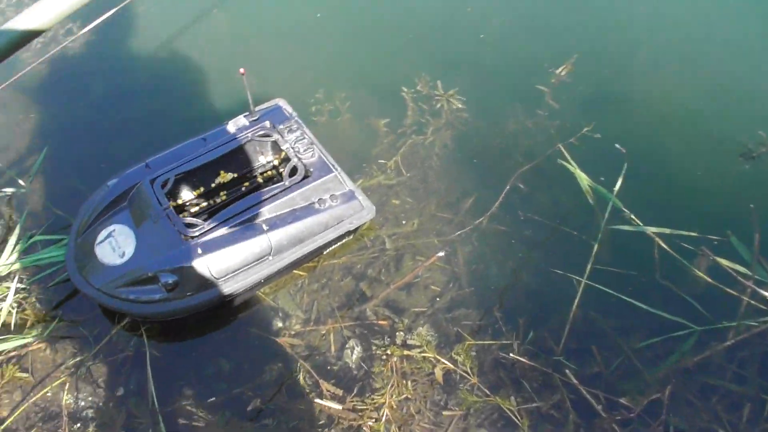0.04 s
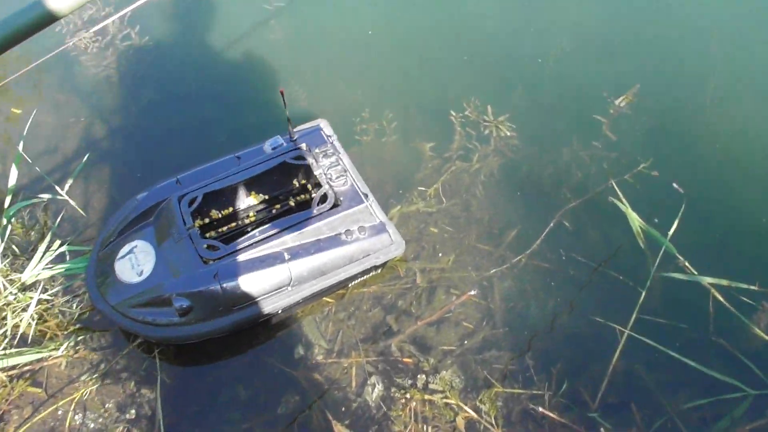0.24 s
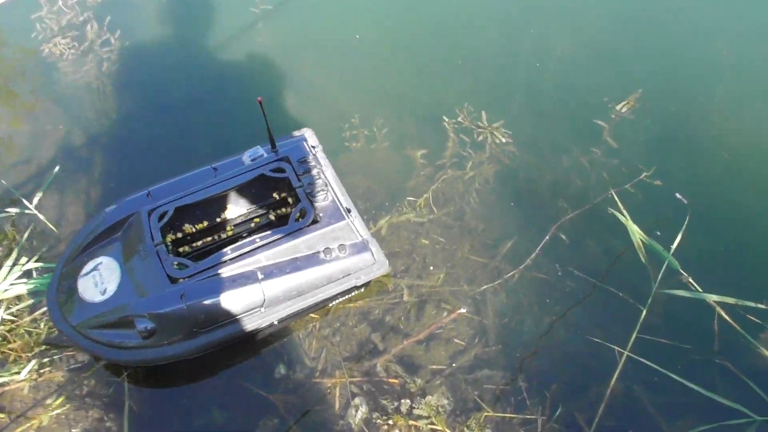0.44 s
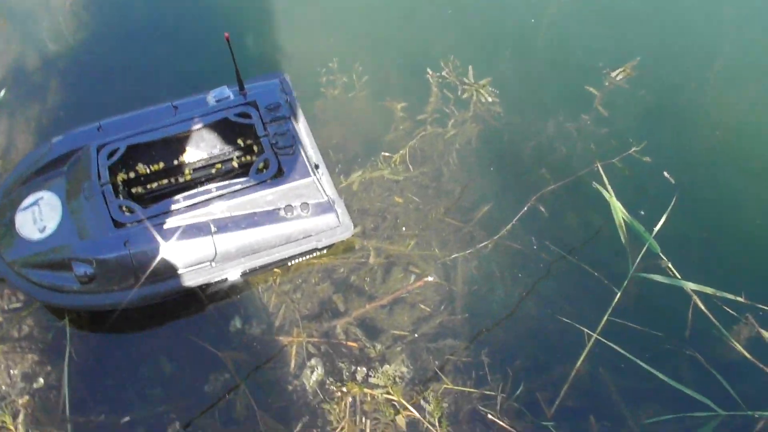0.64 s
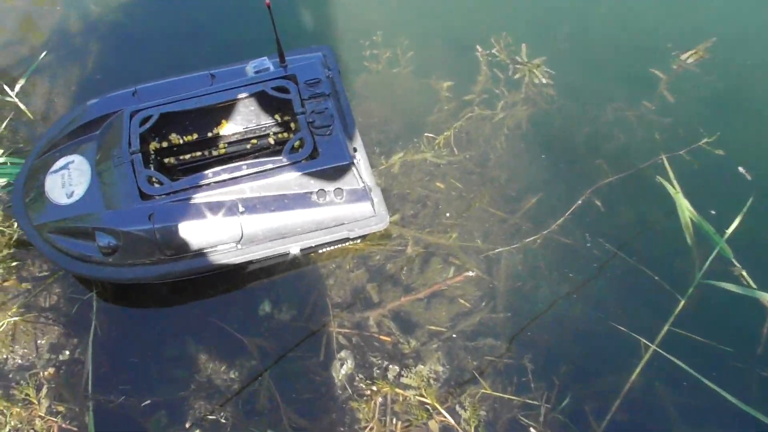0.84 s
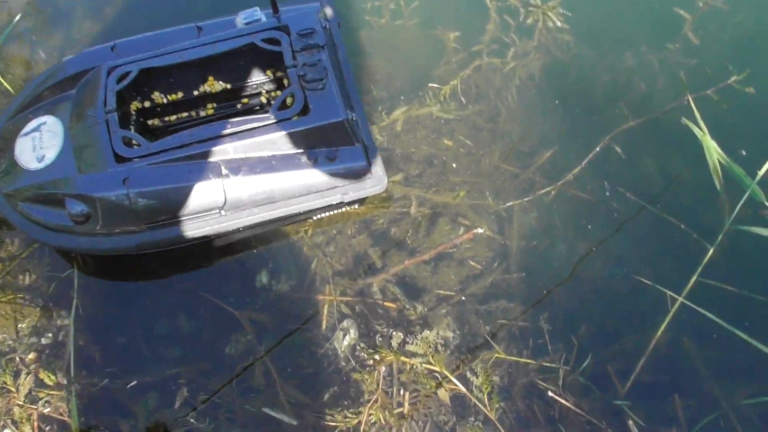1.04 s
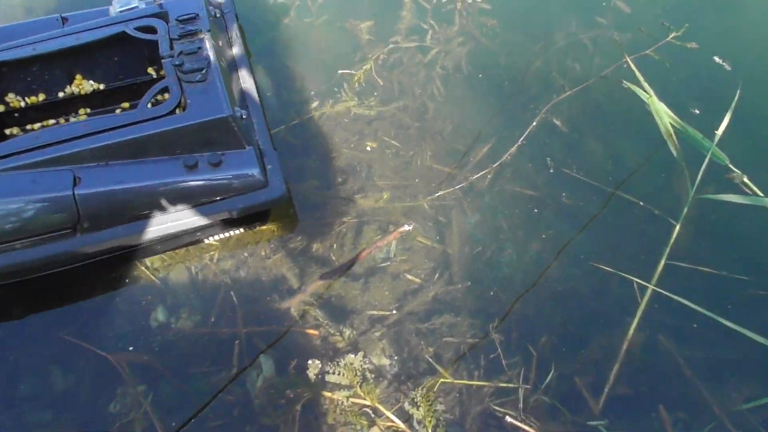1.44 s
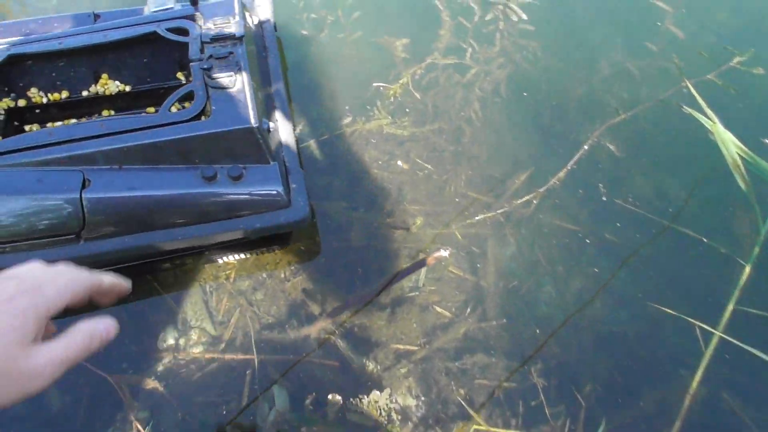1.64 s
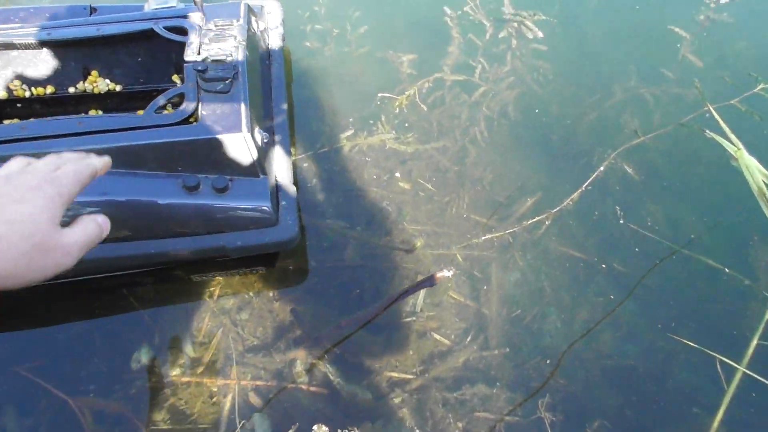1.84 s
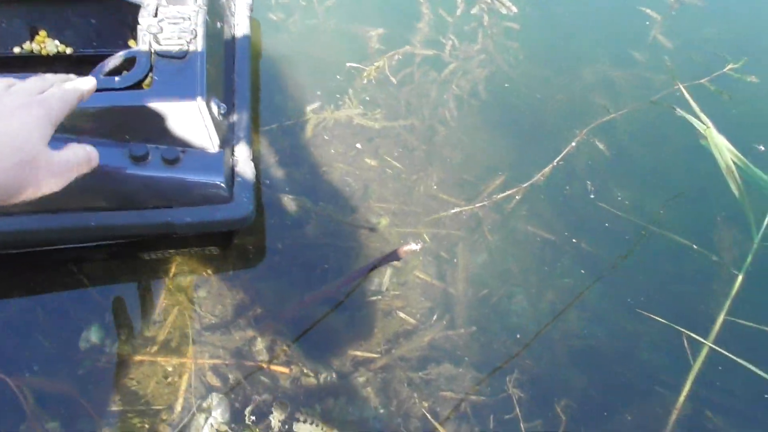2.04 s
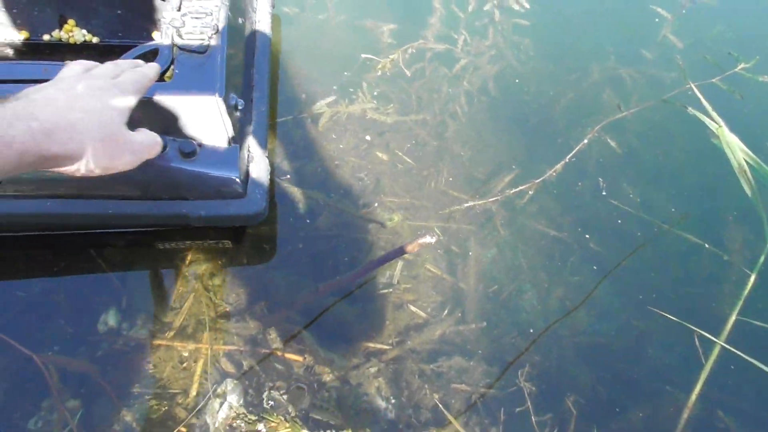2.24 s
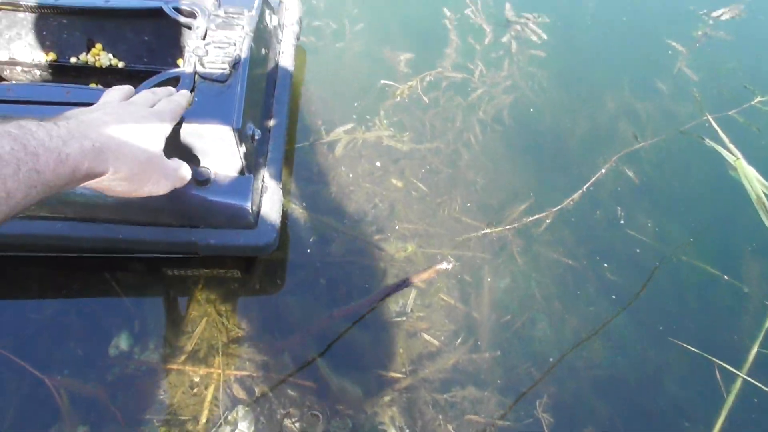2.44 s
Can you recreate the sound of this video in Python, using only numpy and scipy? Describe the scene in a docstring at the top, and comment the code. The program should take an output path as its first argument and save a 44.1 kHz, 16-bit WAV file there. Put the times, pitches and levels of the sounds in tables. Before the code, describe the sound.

Close handling of a plastic toy boat: rubbing, ticks and dull knocks outdoors.

```python
"""At a pond's edge, someone leans over a small model boat with a camera in hand.
Close by, fingers rub the plastic casing (stick-slip friction), the casing ticks (impact excitation),
a button snaps down and up (pressure pulses), and fingers and hull knock dully (damped vibration).
Behind lie a low outdoor rumble, a faint hum and one distant songbird, its whistles
reflected from the banks."""
import sys
import numpy as np
from scipy import signal
from scipy.fft import rfft, irfft
from scipy.io import wavfile
from scipy.ndimage import uniform_filter1d

SR = 44100
rng = np.random.default_rng(int(sys.argv[2]) if len(sys.argv) > 2 else 0)


def to_wav(s):
    """Save 16-bit WAV."""
    ch = np.atleast_2d(s).T  # columns
    pcm = np.round(np.clip(ch, -1, 1) * 32767)  # PCM
    wavfile.write(sys.argv[1], SR, pcm.astype(np.int16))


N = 114660
TOP_HZ = 16200


def undb(db):
    """Amplitude ratio for a level in decibels."""
    return 10 ** (np.asarray(db) / 20)


def unit(x):
    """Normalisation to rms 1."""
    return x / np.sqrt(np.mean(x ** 2))


def unit_energy(x):
    """Normalisation of each channel to energy 1."""
    return x / np.sqrt(np.sum(x ** 2, axis=-1, keepdims=True))


def colour(x, response):
    """Minimum-phase filtering by a response (f/Hz, gain/dB), built by folding the cepstrum."""
    size = 2 * N
    hz, db = np.array(response, float).T
    gain = undb(np.interp(np.log(np.fft.rfftfreq(size, 1 / SR) + 1), np.log(hz), db))
    cepstrum = irfft(np.log(gain))
    cepstrum[1:N] *= 2
    cepstrum[N + 1:] = 0
    return irfft(rfft(x, size) * np.exp(rfft(cepstrum)))[..., :N]


def wander(rate):
    """Random modulation of rms 1, gliding to a new value `rate` times a second."""
    hold = max(int(SR / rate), 2)
    steps = np.repeat(rng.standard_normal(N // hold + 1), hold)
    return unit(uniform_filter1d(steps, hold)[:N])


def envelope(table, column=1):
    """Amplitude envelope, interpolated in decibels between the rows of a table."""
    rows = np.array(table, float)
    return undb(np.interp(np.arange(N) / SR, rows[:, 0], rows[:, column]))


def stereo(mid, side, width):
    """Mid-side stereo: the mid is in phase in both channels, the filtered side in antiphase."""
    return mid + colour(side, width) * np.array([[1], [-1]])


def add(out, start, sound):
    """Superposition of a sound from a start time in seconds."""
    i = max(int(start * SR), 0)
    out[..., i:i + sound.shape[-1]] += sound[..., :N - i]


# Spectrum of the outdoor background: f/Hz, relative level/dB
AMBIENT_SPECTRUM = [(15, -66), (25, 2.5), (87, 4.5), (223, -8), (384, -0.5), (887, -12.5), (1400, -28.5),
                    (5280, -29.5), (6920, -19.5), (16000, -32)]
# Its stereo width: f/Hz, side-to-mid ratio/dB
AMBIENT_WIDTH = [(30, -30), (120, -2.5), (4400, -39), (14000, 1)]
def outdoor_rumble(level_db=-49, swell_db=1.5):
    """Filtered noise: a low rumble and thin hiss swell gently by amplitude modulation."""
    mid, side = unit(colour(rng.standard_normal((2, N)), AMBIENT_SPECTRUM))
    return stereo(mid, side, AMBIENT_WIDTH) * undb(level_db + swell_db * wander(9.65))


def slip_noise(bands=10, slips_per_band_s=900, spread_db=3.2):
    """Shot noise: two independent streams of slips, mostly small, each slip sounding in one band."""
    shape = (bands, 2, N)
    occurs = rng.random(shape) < slips_per_band_s / SR
    strength = undb(spread_db * np.minimum(rng.exponential(size=shape), 5))
    slips = occurs * strength * rng.choice([-1, 1], shape)
    band_position = np.fft.rfftfreq(N, 1 / SR) / TOP_HZ * (bands - 1)
    windows = (np.cos(np.pi / 2 * np.clip(band_position - k, -1, 1)) for k in range(bands))
    return irfft(sum(spectrum * window for spectrum, window in zip(rfft(slips), windows)), N)


# Course of the rubbing: t/s, hiss level/dB, rumble level/dB
RUB_LEVELS = [(0, -44, -43.5), (.06, -50, -47.5), (.30, -55, -84), (.375, -42.5, -54), (.42, -55, -50.5),
              (.485, -51, -47), (.497, -36.5, -35.5), (.53, -38.5, -34.5), (.60, -46.5, -48),
              (.645, -43, -43), (.72, -47, -48), (.82, -48, -47), (.865, -43.5, -47.5),
              (.995, -50.5, -44.5), (1.015, -36, -38.5), (1.07, -44, -39.5), (1.13, -51, -47),
              (1.29, -49, -43), (1.42, -54.5, -54), (1.72, -53.5, -52), (1.80, -46.5, -47),
              (1.91, -56.5, -54.5), (1.95, -41.5, -40), (2.02, -62.5, -63), (2.18, -56.5, -50),
              (2.428, -64.5, -63), (2.44, -53, -56), (2.6, -58, -54.5)]
# Spectra of the friction hiss and rumble: f/Hz, relative level/dB
RUB_HISS_SPECTRUM = [(700, -40), (1400, -12), (2800, -8), (4400, 0.5), (5200, -7), (6000, 2.5), (7200, 6.5),
                     (9000, 1.5), (11000, -5.5), (16000, -15.5)]
RUB_RUMBLE_SPECTRUM = [(30, -7.5), (180, -1.5), (600, -2.5), (1100, -5), (1400, -17.5), (5000, -42.5)]
# Stereo widths of the casing's hiss, ticks and scrapes, and of its rumble: f/Hz, side-to-mid ratio/dB
CASING_WIDTH = [(2400, -14), (5400, -27), (6800, -14), (8500, -2), (13000, -1)]
RUB_RUMBLE_WIDTH = [(200, -2), (900, -9)]
def finger_rubbing(flutter_db=1.2):
    """Stick-slip friction: skin catches and slides on plastic, giving a crackly hiss and a rumble."""
    def layer(spectrum, width):
        mid, side = unit(colour(slip_noise(), spectrum))
        return stereo(mid, side, width) * undb(flutter_db * wander(70))
    hiss = layer(RUB_HISS_SPECTRUM, CASING_WIDTH) * envelope(RUB_LEVELS)
    rumble = layer(RUB_RUMBLE_SPECTRUM, RUB_RUMBLE_WIDTH) * envelope(RUB_LEVELS, column=2)
    return hiss + rumble


# Response of the small casing: f/Hz, gain/dB
CASING_RESPONSE = [(300, -10.5), (1000, -19), (1400, -51.5), (2500, -18), (3400, -7), (5200, -1.5),
                   (6000, 5), (8200, 6), (11500, -11), (16000, -14)]
# Impacts on the plastic: t/s, relative level/dB, mode f/Hz, scrape time constant/ms
TICK_IMPACTS = [(0.0874, -9.5, 8000, 0.67), (0.089, -6.5, 6140, 0.37), (0.186, -13, 7640, 0.23),
                (0.1915, -17.5, 6800, 0.42), (0.2106, -22, 5600, 0.2), (.2840, -5.5, 6760, 0.14),
                (0.291, -19.5, 5960, 1.2), (0.388, -18, 6200, 0.24), (0.3944, -23.5, 6000, 0.1),
                (0.4197, -31, 5100, 0.1), (0.5211, -11.5, 6600, 5.7), (0.575, -10.5, 7960, 0.5),
                (0.852, -25.5, 8900, 0.66), (1.0322, -16.5, 7350, 1.1), (1.0897, -26.5, 10300, 0.4),
                (1.1758, -16.5, 7650, 0.21), (1.198, -21.5, 7440, 0.3), (1.6465, -18, 8500, 2.5),
                (1.9333, -22.5, 7740, 0.82), (1.9597, -24, 7750, 1.8), (1.9870, -20.5, 12500, 0.21),
                (2.1366, -22, 6400, 0.31), (2.1818, -13, 7800, 0.55), (2.1834, -17, 3800, 1.5),
                (2.195, -25, 7700, 0.52), (2.2804, -17, 6930, 2.7)]
def casing_ticks(ring_decay_s=.0003, rattle_decay_s=.004, rattle_db=-4, crack_db=-1, side_db=-3):
    """Impact excitation: a snap with a brief scrape and rattle drives the casing and one damped mode."""
    t = np.arange(2048) / SR
    cracks, rings = np.zeros((2, N)), np.zeros((2, N))
    for start, db, hz, scrape_ms in TICK_IMPACTS:
        scrape_noise, rattle_noise = rng.standard_normal((2, 2, len(t)))
        contact = 2 * scrape_ms * unit_energy(scrape_noise * np.exp(-(1000 * t / scrape_ms) ** 2))
        contact[0, 0] += np.exp(-scrape_ms)  # the snap: strongest when the scrape is short
        rattle = unit_energy(rattle_noise * np.exp(-t / rattle_decay_s))
        force = unit_energy(contact) + undb(rattle_db) * rattle
        mode = np.sin(2 * np.pi * hz * t) * np.exp(-t / ring_decay_s)
        add(cracks, start, 2 * undb(db + crack_db) * force)
        add(rings, start, 2 * undb(db) * unit_energy(signal.fftconvolve(force, mode[None])))
    mid, side = colour(cracks, CASING_RESPONSE) + rings
    return stereo(mid, undb(side_db) * side, CASING_WIDTH)


# Press and release of the button: t/s, peak level/dB, polarity, Gaussian half-width/ms
BUTTON_PULSES = [(0.0887, -7, -1, 0.36), (0.2851, -2, 1, 0.3)]
def button_snap():
    """Pressure pulses of opposite sign: the button pushes the casing in, then lets it go."""
    t, out = np.arange(N) / SR, np.zeros(N)
    for peak_s, db, polarity, width_ms in BUTTON_PULSES:
        out += polarity * undb(db) * np.exp(-.5 * (1000 * (t - peak_s) / width_ms) ** 2)
    return out


# Short slides: centre t/s, duration/s, level/dB, centre f/Hz
SCRAPE_STROKES = [(0.372, 0.053, -47, 11000), (0.533, 0.036, -44, 1070), (0.652, 0.071, -44.5, 12000),
                  (0.8625, 0.0026, -39, 3570), (0.986, 0.0073, -40.5, 2440), (1.372, 0.04, -51, 1300),
                  (1.944, 0.11, -57, 1470), (2.165, 0.015, -48.5, 2350)]
def scrapes(edge_ratio=1.65):
    """Band-limited friction noise: brief slides swell and fade; low ones crunch, high ones swish."""
    t, slips, mid_side = np.arange(N) / SR, slip_noise(), np.zeros((2, N))
    for centre_s, duration, db, hz in SCRAPE_STROKES:
        edges_hz = [hz / edge_ratio, min(hz * edge_ratio, TOP_HZ)]
        band = signal.butter(2, edges_hz, "band", fs=SR, output="sos")
        swell = np.exp(-(2 * (t - centre_s) / duration) ** 2)
        mid_side += unit(signal.sosfilt(band, slips)) * undb(db) * swell
    return stereo(*mid_side, CASING_WIDTH)


# Soft contacts of fingers and hull: peak t/s, peak level/dB, f/Hz
KNOCK_CONTACTS = [(0.4968, -23.5, 197), (0.5274, -21.5, 830), (0.626, -29, 220), (0.9358, -29, 1100),
                  (1.0052, -19, 540), (1.0083, -20.5, 265), (1.292, -31, 810), (1.3823, -29, 1200),
                  (1.648, -32.5, 1000), (1.9895, -29, 350), (2.01, -32.5, 366), (2.026, -34, 370),
                  (2.042, -34, 315), (2.0591, -33, 324), (2.137, -33, 930), (2.175, -30.5, 375),
                  (2.1822, -32, 565), (2.25, -36.5, 334), (2.282, -34, 710), (2.368, -34.5, 322),
                  (2.563, -34.5, 940)]
def dull_knocks(skew=.8, half_width_at_1khz_s=.00085):
    """Heavily damped vibration: each contact rings for a few cycles at most, fading slower than it rises."""
    t, out = np.arange(N) / SR, np.zeros(N)
    for peak_s, db, hz in KNOCK_CONTACTS:
        lag = t - peak_s
        half_width = half_width_at_1khz_s * np.sqrt(1000 / hz)  # higher knocks are shorter
        skewed_width = half_width * (1 + skew * np.sign(lag))
        out += undb(db) * np.exp(-.5 * (lag / skewed_width) ** 2) * np.cos(2 * np.pi * hz * lag)
    return out


# Rise and fall of the hum: t/s, level/dB
HUM_LEVELS = [(1.3, -67), (1.47, -47.5), (1.6, -56.5), (2.6, -64)]
def faint_hum(hz=396, deviation_hz=8.8, flutter_db=2.5):
    """Random frequency and amplitude modulation make a faint pure tone waver."""
    phase = 2 * np.pi * np.cumsum(hz + deviation_hz * wander(29.86)) / SR
    return np.sqrt(2) * np.sin(phase) * envelope(HUM_LEVELS) * undb(flutter_db * wander(36.9))


# Whistled notes: t/s, duration/s, peak level/dB, start f/Hz, end f/Hz
BIRD_NOTES = [(1.384, 0.048, -51.5, 4700, 3620), (1.448, 0.018, -52.5, 4670, 4050),
              (1.447, 0.073, -50, 2865, 2966), (1.606, 0.13, -51, 2940, 3064),
              (1.774, 0.037, -47, 6600, 3880), (1.804, 0.051, -47, 3620, 3484),
              (1.941, 0.085, -53.5, 3820, 3620), (2.179, 0.059, -45, 4300, 4530),
              (2.244, 0.019, -51, 4550, 5500), (2.254, 0.035, -50, 5000, 3050),
              (2.296, 0.031, -49, 3470, 3900), (2.562, 0.04, -47.5, 6300, 5200)]
def songbird(glide_power=1.6, wobble_depth=.012, echo_db=-10, echo_t60_s=.5):
    """Frequency glides with reverberation: whistles sweep, settle and reflect from the banks."""
    song, wobble = np.zeros(N), wander(760)
    for start, duration, db, start_hz, end_hz in BIRD_NOTES:
        progress = np.linspace(0, 1, int(duration * SR))
        glide_hz = end_hz + (start_hz - end_hz) * (1 - progress) ** glide_power
        hz = glide_hz * (1 + wobble_depth * np.roll(wobble, -int(start * SR))[:len(progress)])
        swell = np.sqrt(np.abs(np.sin(np.pi * progress)))
        add(song, start, undb(db) * swell * np.sin(2 * np.pi * np.cumsum(hz) / SR))
    t = np.arange(SR) / SR
    reflections = unit_energy(rng.standard_normal(SR) * undb(-60 * t / echo_t60_s))
    return song + undb(echo_db) * signal.fftconvolve(song, reflections)[:N]


def scene():
    """Superposition of the close handling sounds and the quiet pondside."""
    return (casing_ticks() + finger_rubbing() + scrapes() + outdoor_rumble()
            + button_snap() + dull_knocks() + faint_hum() + songbird())


def record(dry, dip_hz=1372, dip_width_hz=220):
    """Frequency response: the microphone has a midrange notch and the recorder a low-pass cutoff."""
    notch = signal.iirnotch(dip_hz, dip_hz / dip_width_hz, fs=SR)
    low_pass = signal.ellip(8, .2, 70, TOP_HZ, fs=SR, output="sos")
    return signal.sosfilt(low_pass, signal.lfilter(*notch, dry))


dry = scene()
out = record(dry)
to_wav(out)
```